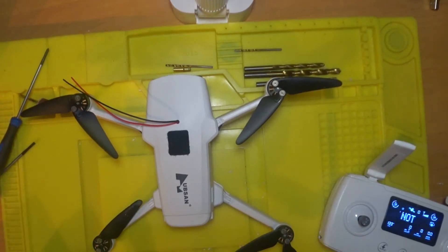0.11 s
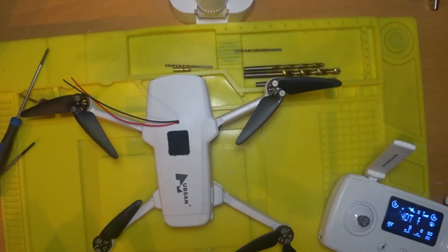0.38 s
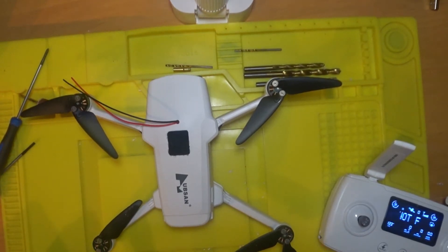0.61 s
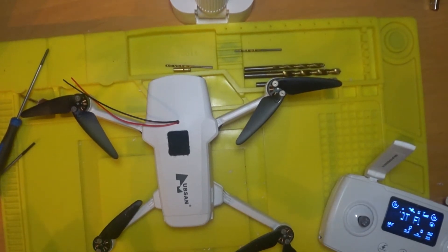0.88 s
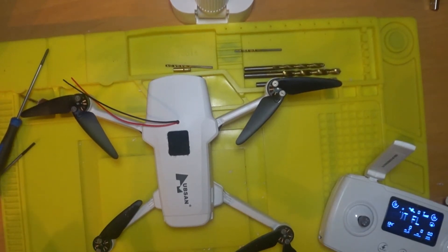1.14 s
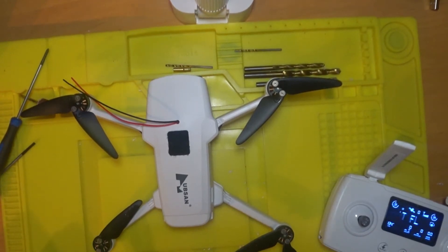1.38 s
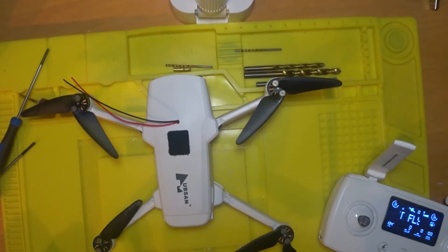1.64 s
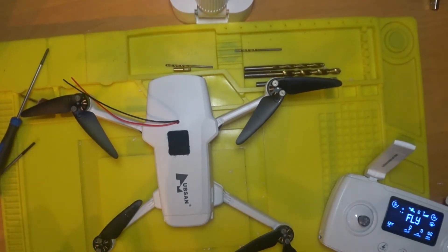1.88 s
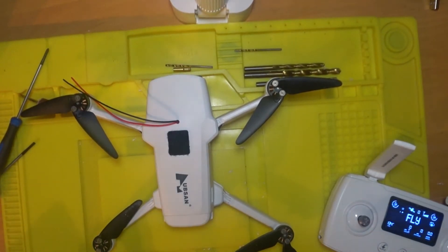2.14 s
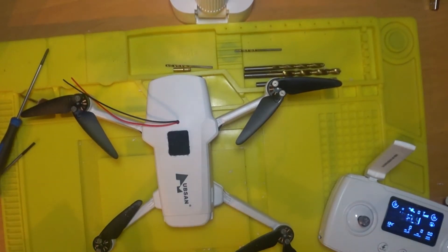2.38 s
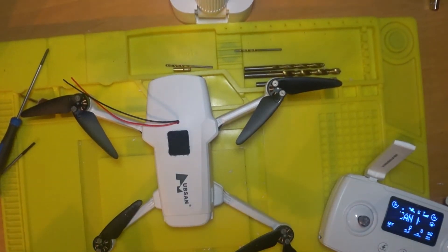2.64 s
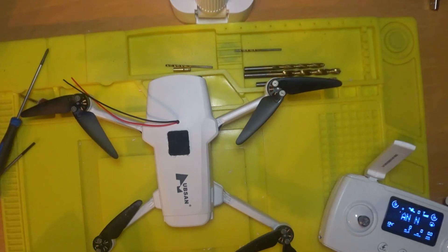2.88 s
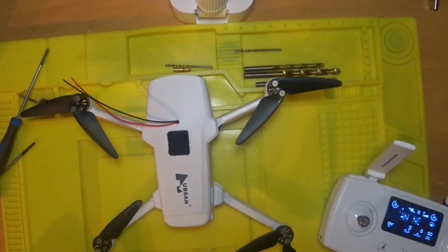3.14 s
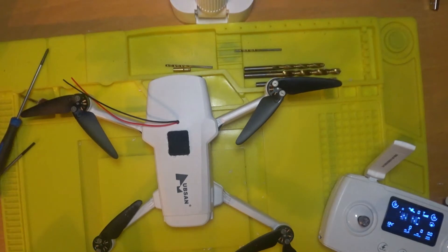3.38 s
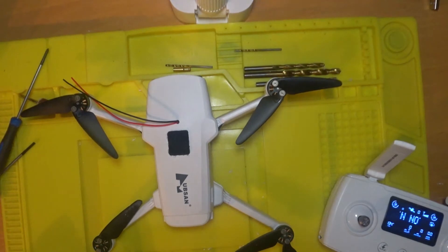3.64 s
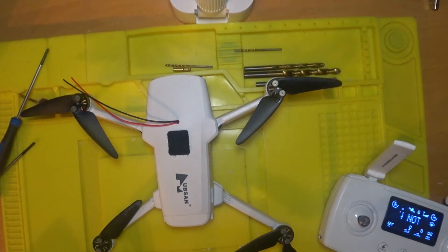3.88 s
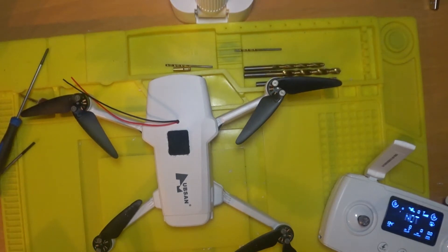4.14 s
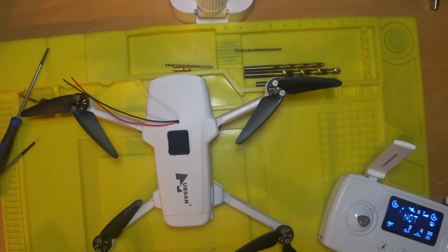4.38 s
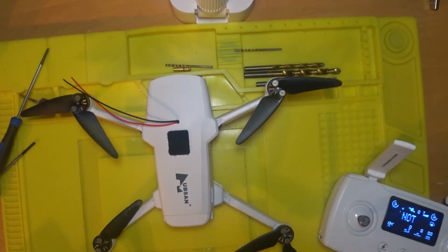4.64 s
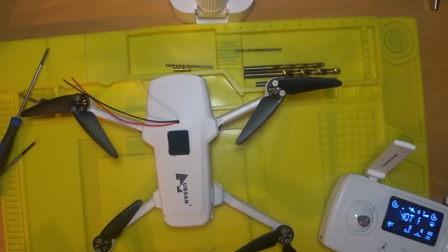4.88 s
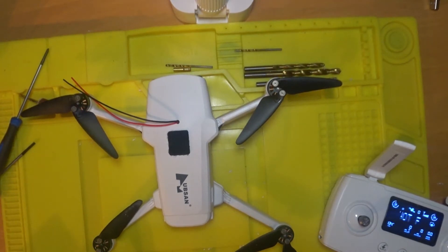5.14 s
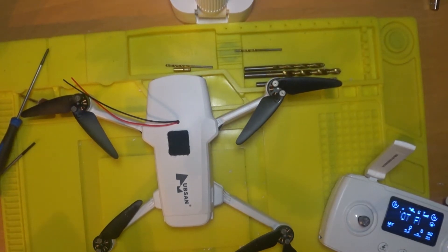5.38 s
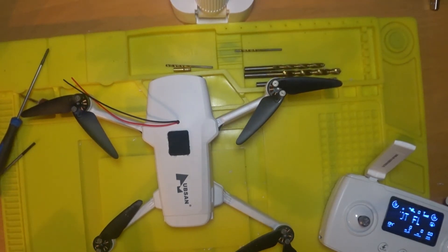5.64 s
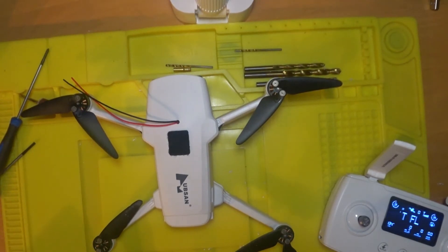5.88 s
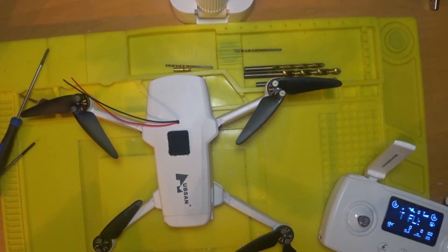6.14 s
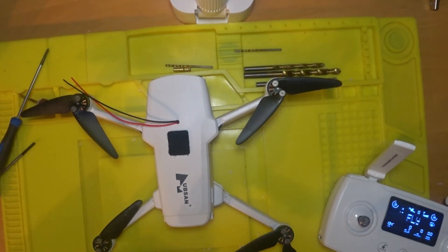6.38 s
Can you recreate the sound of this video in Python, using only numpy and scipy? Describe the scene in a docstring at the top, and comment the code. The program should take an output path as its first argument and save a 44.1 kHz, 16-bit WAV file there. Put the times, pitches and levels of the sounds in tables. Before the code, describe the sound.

Someone fits a phone into the sprung clamp of a light plastic controller. Fingertips rub grittily, parts click, the clamp slips with tiny metallic-sounding rings. Two strong knocks in the middle are separated by quieter fumbling; a short squeak leads into a hard final snap, then near silence. Short room reflections, faint steady hiss, sounds left of centre, little bass.

```python
"""Plastic parts tick and knock as hands fit a phone into the sprung clamp of a controller on a table.
Hard contacts are shaped noise bursts; soft bumps are brief decaying tones with a low rumble.
Fingers rub and rustle on the hollow case as gritty noise; the clamp scrapes, rings and squeaks, then snaps shut.
The sounds lie left of a small stereo microphone. A small furnished room answers with decaying noise tails.
Faint room tone and hiss lie under everything."""
import sys
import numpy as np
from scipy import signal
from scipy.fft import rfft, irfft, next_fast_len
from scipy.io import wavfile
from scipy.ndimage import map_coordinates

SR = 44100
rng = np.random.default_rng(int(sys.argv[2]) if len(sys.argv) > 2 else 0)


def convert_level_to_amplitude(level_db):
    """Map a level in decibels to its linear amplitude factor."""
    exponent = np.asarray(level_db, float) / 20
    return 10 ** exponent


def digitize_waveform(pressure):
    """Quantize a signal to 16-bit integers and store it at the path in sys.argv[1].

    Rows of a 2-D input are taken as channels; values are limited to [-1, 1].
    """
    field = np.atleast_2d(pressure).T
    bounded = np.clip(field, -1, 1)
    quanta = np.round(bounded * 32767).astype(np.int16)
    wavfile.write(sys.argv[1], SR, quanta)


N = 287472

# modes of the hollow case on the table: (frequency [Hz], width [Hz], level [dB])
CASE_MODES = [(350, 220, -5.5), (564, 217, 0), (820, 245, 4.5), (1155, 510, 4), (1880, 1060, -1)]


def unit(x):
    """Scales to rms 1."""
    return x / np.sqrt(np.mean(np.abs(x) ** 2) + 1e-20)


def along(points, hz):
    """Interpolates (Hz, value) points on a log frequency axis."""
    f, v = np.transpose(points)
    return np.interp(np.log(hz + 1), np.log(f + 1), v)


def filtered(x, response):
    """Applies a complex response of frequency to x."""
    m = 2 * next_fast_len(x.shape[-1] // 2 + 4096)
    spectrum = rfft(x, m) * response(np.fft.rfftfreq(m, 1 / SR))
    return irfft(spectrum, m)[..., :x.shape[-1]]


def causal(points):
    """Minimum-phase response through (Hz, dB) points: nothing sounds before a blow."""
    def response(hz):
        cepstrum = irfft(np.log(convert_level_to_amplitude(along(points, hz))))
        fold = np.r_[1, np.full(len(hz) - 2, 2), 1, np.zeros(len(hz) - 2)]
        return np.exp(rfft(cepstrum * fold))
    return response


def modes(table):
    """Causal sum of resonances (Hz, width Hz, dB) with alternating signs."""
    def response(f):
        total = 0
        for k, (c, w, db) in enumerate(table):
            total = total + (-1) ** k * convert_level_to_amplitude(db) * 1j * f * w / (c * c - f * f + 1j * f * w)
        return total
    return response


def pair(noise, alike):
    """Mixes two unrelated noises to a left-right likeness per frequency."""
    def mid_side(hz):
        turn = np.arccos(np.clip(along(alike, hz), -1, 1)) / 2
        return np.array([np.cos(turn), np.sin(turn)])
    mid, side = filtered(noise, mid_side)
    return np.array([mid + side, mid - side])


def burst(noise, attack_s, decay_s):
    """A jolt and its chatter: noise of partly flattened spectrum, its energy set by the decay."""
    t = np.arange(len(noise)) / SR
    z = rfft(noise * (1 - np.exp(-t / attack_s)) * np.exp(-t / decay_s))
    chatter = irfft(z / np.abs(z) ** 0.55) * np.exp(-t / (3 * decay_s))
    return chatter / np.linalg.norm(chatter) * np.sqrt(decay_s * SR)


def add(track, start_s, sound):
    """Mixes a sound in at start_s."""
    part = track[round(start_s * SR):][:len(sound)]
    part += sound[:len(part)]


def room_tone():
    """Steady coloured noise, its left-right likeness varying with frequency."""
    # (frequency [Hz], relative level [dB])
    colour = [(40, -34), (200, -16.5), (427, -15), (610, -5), (2180, -6), (2610, -7), (2830, -10),
              (9500, -18), (12400, -20)]
    # (frequency [Hz], left-right likeness [-1..1])
    likeness = [(60, 1), (220, -0.54), (840, -0.67), (3140, -0.58), (11800, 0.5)]
    noise = filtered(rng.standard_normal((2, N)), lambda hz: convert_level_to_amplitude(along(colour, hz)))
    return convert_level_to_amplitude(-58.5) * unit(pair(noise, likeness))


def room(x):
    """Each frequency dies at its own speed; hands move, so every 1/8 s of sound gets a fresh tail."""
    # reverberation: (frequency [Hz], t60 [s])
    t60 = [(200, 0.21), (1000, 0.36), (4000, .27), (10000, .22)]
    # (frequency [Hz], left-right likeness [-1..1])
    likeness = [(200, 0.93), (1000, 0.76), (4000, .4), (10000, 0.33)]
    out, step = np.zeros((2, N + SR)), SR // 8
    for a in range(0, N, step):
        hz, t, z = signal.stft(rng.standard_normal((2, SR // 2)), SR, nperseg=256)
        decay = convert_level_to_amplitude(-60 * t / along(t60, hz)[:, None])
        noise = signal.istft(z * decay, SR, nperseg=256)[1]
        tail = pair(noise, likeness)
        tail *= 1 - np.exp(-np.arange(tail.shape[1]) / (0.00059 * SR))  # the first walls answer late
        wet = signal.fftconvolve(x[None, a:a + step], tail / np.linalg.norm(tail[0]), axes=1)
        out[:, a:a + wet.shape[1]] += wet
    return out[:, :N]


def from_left(x):
    """Direct sound: louder and earlier in the left channel, by amounts set per frequency."""
    # (frequency [Hz], left over right [dB], left leads by [rad])
    offsets = [(300, -0.5, 0.62), (1026, 1.5, 0.81), (3000, 6, 0.71), (9800, 4, 0.98)]
    f, left_db, lead_rad = np.transpose(offsets)
    side = np.array([[0.5], [-0.5]])

    def response(hz):
        gain = convert_level_to_amplitude(side * along(np.c_[f, left_db], hz))
        return gain * np.exp(1j * side * along(np.c_[f, lead_rad], hz))
    return filtered(x, response)


def grit(knots_per_s, spread_db):
    """Stick-slip noise: its level in dB runs between random knots."""
    knots = rng.standard_normal(N)
    wander = map_coordinates(knots, [np.arange(N) * knots_per_s / SR], order=1)
    return rng.standard_normal(N) * convert_level_to_amplitude(spread_db * wander)


def strokes(t, fade_db_per_s, column):
    """Gain of one layer (column 2 rub, 3 rustle): a slow ground plus strokes that rise, hold and fade."""
    # hands shifting on the case: (time [s], dull rub [dB], bright rustle [dB])
    ground = [(0, -78, -76), (0.1, -69.5, -68.5), (0.3, -82.5, -66.5), (0.62, -82, -85),
              (0.8, -58.5, -58.5), (1.2, -63, -62), (1.55, -74.5, -63.5), (2.12, -69.5, -58.5),
              (2.55, -70.5, -67), (2.9, -76.5, -62), (3.0, -78, -63.5), (3.45, -76, -70.5),
              (4.1, -71, -65.5), (4.6, -82, -68), (4.76, -72, -63.5), (5.75, -76.5, -65), (6.1, -86, -68.5),
              (6.4, -81, -70.5)]
    # finger strokes: (start [s], hold incl. attack [s], dull rub [dB], bright rustle [dB])
    stroke_rows = [(0.632, 0.049, -67, -55), (0.704, 0.073, -66.5, -57.5), (1.127, 0.027, -77, -78),
                   (1.299, 0.05, -58.5, -70), (1.359, 0.017, -57, -49), (1.806, 0.063, -79, -72),
                   (2.772, 0.017, -69, -52.5), (2.856, 0.015, -53, -62), (3.006, 0.0078, -78, -57),
                   (3.081, 0.12, -77, -59), (3.18, 0.023, -65, -52), (3.457, 0.021, -45.5, -46),
                   (3.498, 0.033, -43, -33), (3.625, 0.19, -60, -55.5), (3.773, 0.03, -65, -48.5),
                   (3.83, 0.02, -67, -60), (4.237, 0.031, -44, -43), (4.808, 0.053, -62.5, -55.5),
                   (4.85, 0.011, -51, -50), (4.95, 0.091, -62.5, -55.5), (5.072, 0.16, -61.5, -54.5),
                   (5.389, 0.048, -65, -36.5), (6.456, 0.032, -79, -63.5)]
    attack_s = 0.011
    gain = convert_level_to_amplitude(np.interp(t, *np.transpose(ground)[[0, column - 1]]))
    for row in stroke_rows:
        u = t - row[0]
        fade_db = fade_db_per_s * np.maximum(u - row[1], 0)
        gain = gain + np.clip(u / attack_s, 0, 1) * convert_level_to_amplitude(row[column] - fade_db)
    return gain


def fingers():
    """Skin drags on the case: a dull grainy rub in its resonances and a gritty rustle with ticks."""
    # rustle colour: (frequency [Hz], level [dB])
    rustle_colour = [(600, -15), (1500, 1.5), (3000, 1), (6000, -1.5), (11000, -5)]
    ticks_per_s, tick_gain_db, tick_spread_db, tick_decay_s = 60, 4, 5, 0.0021
    t = np.arange(N) / SR

    def soft_case(hz):
        return modes(CASE_MODES)(hz) / (1 + (hz / 750) ** 4)  # soft skin: no treble
    rub = unit(filtered(grit(110, 5), soft_case))
    rustle = unit(filtered(grit(120, 3), causal(rustle_colour)))
    # skin lets go with tiny ticks
    ticks = (rng.random(N) < ticks_per_s / SR) * convert_level_to_amplitude(tick_spread_db * rng.standard_normal(N))
    envelope = signal.lfilter([1], [1, -np.exp(-1 / (tick_decay_s * SR))], ticks)
    chatter = envelope * rng.standard_normal(N)
    rustle = rustle + convert_level_to_amplitude(tick_gain_db) * filtered(chatter, causal(rustle_colour))
    return rub * strokes(t, 215, column=2) + rustle * strokes(t, 249, column=3)


def squeaks():
    """Under load the clamp or case sings one mode: a tone swells and dies, wavering in strength."""
    # (start [s], length [s], frequency [Hz], level [dB])
    tones = [(2.5, 0.32, 840, -65.5), (5.394, 0.049, 866, -48), (5.407, 0.047, 2890, -41.5),
             (5.393, 0.012, 2260, -32.5), (5.412, 0.024, 2220, -20.5), (5.446, 0.011, 2250, -31)]
    out = np.zeros(N)
    for start_s, length_s, hz, db in tones:
        t = np.arange(round(length_s * SR)) / SR
        swell = np.sin(np.pi * t / length_s)
        add(out, start_s, convert_level_to_amplitude(db) * swell * np.sin(2 * np.pi * hz * t))
    waver = map_coordinates(rng.standard_normal(N), [np.arange(N) * 60 / SR])
    return out * convert_level_to_amplitude(2.0 * waver)


def clamp():
    """Each slip rings the clamp at its own lowest mode; the upper modes follow that pitch weakly."""
    # slips: (time [s], level before gain [dB], lowest mode [Hz], upper modes [dB])
    slips = [(0.8724, -44, 2710, -6), (0.891, -42, 2700, -14), (1.704, -48, 2600, -10),
             (1.7371, -36.5, 2650, -15), (1.7906, -38.5, 2510, -12), (1.8154, -38, 2610, -8),
             (1.8438, -45, 2850, 3.5), (1.8674, -49.5, 2500, 4.5), (2.7866, -42, 2070, -4),
             (2.8625, -40, 2450, -5), (3.473, -24, 2240, -13), (3.4989, -17.5, 2256, 2),
             (3.7685, -34.5, 2210, -2.5), (3.795, -33, 2344, -22), (3.8112, -34.5, 2420, -6),
             (5.1362, -35, 2340, -13), (5.1539, -36.5, 2320, -22), (5.1791, -31, 2404, -18),
             (5.259, -43, 2270, -6.5)]
    # upper modes when the lowest is 2250 Hz: (frequency [Hz], width [Hz], level over lowest [dB])
    upper_modes = [(3360, 73, -1.5), (4200, 94, -0.5), (5570, 100, -4.5), (6260, 140, -8.5)]
    # a harder slip chatters longer: (level before gain [dB], decay [s])
    slip_decay = [(-46.5, 0.008), (-20, 0.014)]
    gain_db, lowest_width_hz = 13.5, 90
    out = np.zeros(N)
    for (s, db, hz, upper_db), noise in zip(slips, rng.standard_normal((len(slips), 4096))):
        upper = [(c * (hz / 2250) ** 0.27, w, level + upper_db) for c, w, level in upper_modes]
        decay_s = np.interp(db, *np.transpose(slip_decay))
        ring = modes([(hz, lowest_width_hz, 0)] + upper)
        add(out, s, convert_level_to_amplitude(db) * filtered(burst(noise, 0.00054, decay_s), ring))
    return convert_level_to_amplitude(gain_db) * out


def knocks():
    """Soft bumps: a pushed panel rings briefly, low ones longer, and the whole case rumbles with it. The two
    rows near 1.6 kHz, at 1.034 s and 1.4555 s, instead give a narrow ring to the hard cracks there."""
    # (time [s], level [dB], frequency [Hz])
    bumps = [(0.644, -38, 816), (0.7, -42, 755), (0.723, -34.5, 566), (0.927, -44.5, 428),
             (1.034, -36, 1580), (1.225, -54, 706), (1.367, -33.5, 605), (1.4555, -25, 1627),
             (1.457, -59, 807), (2.167, -19, 1215), (2.228, -16.5, 760), (2.272, -22, 678),
             (2.296, -27.5, 800), (2.861, -34, 768), (3.315, -47, 279), (3.499, -11, 817),
             (3.499, -16, 1490), (3.502, -18, 450), (3.786, -33.5, 770), (4.133, -39.5, 666),
             (4.247, -29.5, 800), (4.25, -33, 147), (4.257, -33, 780), (4.288, -32, 723), (4.512, -47, 650),
             (4.854, -31, 780), (4.881, -32.5, 890), (5.036, -23.5, 820), (5.177, -33, 648),
             (5.244, -36, 747), (5.465, -13.5, 256), (5.467, -11, 380)]
    # a firmer push stays on the panel and damps it: (level [dB], decay at 750 Hz [s])
    bump_decay = [(-31.5, 0.0046), (-20, 0.0037), (-8, 0.0021)]
    panel, rumble, t = np.zeros(N), np.zeros(N), np.arange(4096) / SR
    for (s, db, hz), noise in zip(bumps, rng.standard_normal((len(bumps), len(t)))):
        decay_s = np.interp(db, *np.transpose(bump_decay))
        envelope = (1 - np.exp(-t / 0.0022)) * np.exp(-t / decay_s * (hz / 750) ** 0.37)
        add(panel, s, convert_level_to_amplitude(db) * envelope * np.sin(2 * np.pi * hz * t))
        rumble_db = db + np.interp(db, [-50, -15], [-4, 3])
        add(rumble, s, convert_level_to_amplitude(rumble_db) * burst(noise, 0.003, decay_s))
    panel = filtered(panel, causal([(100, -15.0), (250, 0.0)]))  # a small panel radiates no bass
    return panel + filtered(rumble, modes(CASE_MODES))


def taps():
    """Each hard contact is a short crack around its own pitch, lumped by the part's modes, with some treble."""
    # (time [s], crack level [dB], crack pitch [Hz], treble over crack [dB])
    contacts = [(0.642, -34, 2730, -28), (0.7784, -36.5, 2730, -26), (0.805, -36, 5600, -20),
                (0.87, -42, 5030, -6), (0.9795, -35, 5460, -12), (1.0297, -30.5, 3140, -10),
                (1.034, -30, 2300, -12), (1.124, -32, 3100, -8.5), (1.364, -33, 3600, -8),
                (1.4375, -28, 3200, -16), (1.4554, -24.5, 2960, -4.5), (1.957, -35.5, 6200, -28),
                (2.1627, -27.5, 3000, 7.5), (2.1654, -20, 2500, -1.5), (2.222, -13, 2620, -4.5),
                (2.2315, -21, 2500, -12), (2.2708, -16.5, 3300, -8.5), (2.2835, -29, 3320, -5),
                (2.2882, -24, 3300, -10), (2.2983, -22, 2280, -14), (2.7636, -32, 2330, -9),
                (2.7868, -35, 2250, -14), (2.8635, -36, 2500, -26), (3.0883, -45, 1860, -2),
                (3.139, -35.5, 3400, -1), (3.1398, -29, 5730, -9), (3.1762, -25, 3720, -24),
                (3.2001, -34, 2160, -3.5), (3.4653, -22.5, 2120, -31), (3.499, -14.5, 3300, -7),
                (3.6423, -32.5, 3430, -1.5), (3.7417, -36.5, 2670, -3), (3.761, -31, 2900, -4.5),
                (3.888, -44, 6120, -19), (4.774, -40.5, 2700, -8), (4.8146, -38, 3360, 3),
                (4.8712, -29, 3150, -8.5), (5.036, -28, 1370, -20), (5.0768, -34.5, 3130, -3),
                (5.121, -44, 7000, 4.5), (5.1546, -28.5, 2350, -10), (5.1795, -25.5, 2280, -35),
                (5.2593, -49, 2250, 12), (5.458, -27, 1780, -18), (5.465, -9, 2800, -22),
                (5.468, -8.5, 1400, -15.5), (5.471, -14.5, 4400, -14), (5.994, -45.5, 2940, -5.5)]
    # modes of a struck part: (multiple of crack pitch [1], level over broad crack [dB])
    part_modes = [(0.72, 2.5), (1, 7.5), (1.32, 5.5), (1.74, 5)]
    # treble colour: (frequency [Hz], level [dB])
    treble_colour = [(3500, -38.5), (6000, 0), (8000, 3), (11000, 7)]
    part_width_hz = 265
    out = np.zeros(N)
    for (s, db, hz, treble_db), noise in zip(contacts, rng.standard_normal((len(contacts), 2, 1024))):
        width_hz = hz * np.interp(db, [-35, -10], [0.6, 1.5])  # harder blows shake more of the part
        decay_s = np.interp(db, [-32, -10], [0.0012, 0.004])  # and rattle on for longer
        part = modes([(k * hz, part_width_hz, level) for k, level in part_modes])
        broad = modes([(hz, width_hz, -1.5)])
        crack = filtered(burst(noise[0], 0.0008, decay_s), lambda f: broad(f) ** 2 * (1 + np.abs(part(f))))
        treble = filtered(burst(noise[1], 0.00049, 1.03 * decay_s), causal(treble_colour))
        add(out, s, convert_level_to_amplitude(db) * (crack + convert_level_to_amplitude(treble_db) * treble))
    return out


def scene():
    """Direct sound from the left, the room's answer and the room tone under them."""
    hard = taps() + clamp()
    soft = knocks() + fingers()
    sung = squeaks()
    direct = from_left(hard + soft + sung)
    reverb = room(convert_level_to_amplitude(-4.0) * hard + convert_level_to_amplitude(-5.5) * soft + convert_level_to_amplitude(-8) * sung)
    return direct + reverb + room_tone()


def roll_off(x):
    """The treble ends steeply here."""
    return signal.sosfilt(signal.butter(12, 12370, fs=SR, output="sos"), x)


def record(dry):
    """A thin microphone: weak bass and a steep band limit above 11 kHz."""
    # (frequency [Hz], gain [dB])
    mic_response = [(30, -8.5), (150, -4), (230, 0.5), (400, 1.5), (9000, -4.5), (10900, -4), (11200, -23),
                    (12500, -64), (16000, -58), (22000, -59)]
    mix = filtered(dry, causal(mic_response))
    return roll_off(mix)


dry = scene()
out = record(dry)
digitize_waveform(out)
```